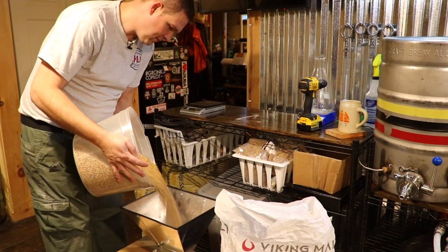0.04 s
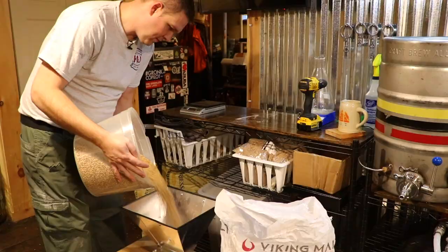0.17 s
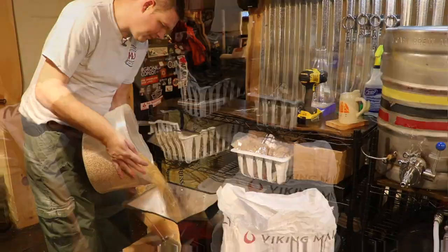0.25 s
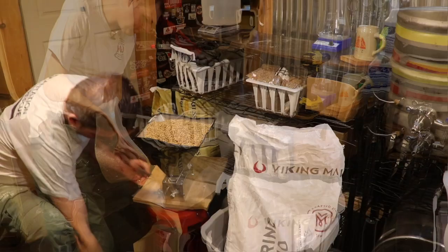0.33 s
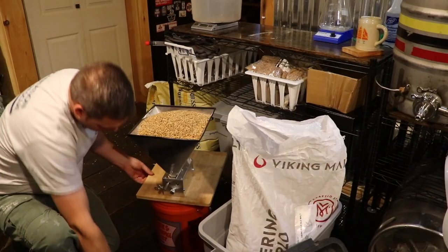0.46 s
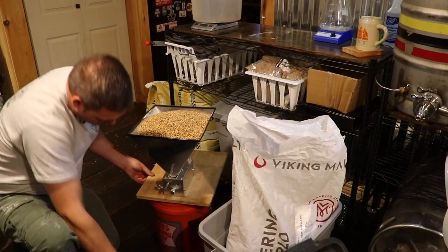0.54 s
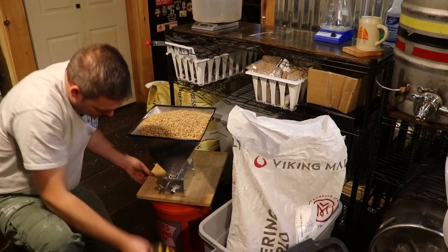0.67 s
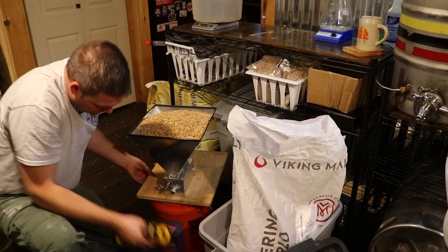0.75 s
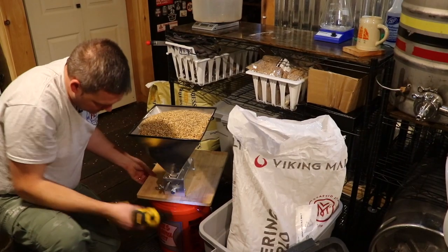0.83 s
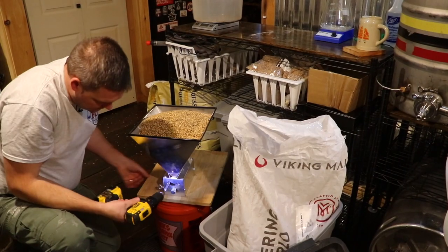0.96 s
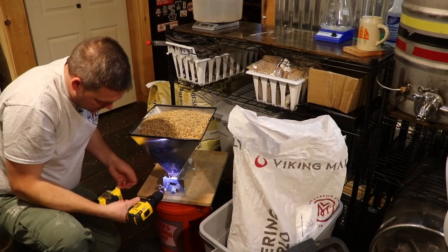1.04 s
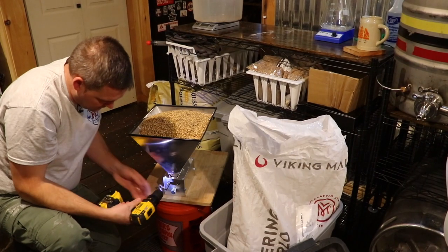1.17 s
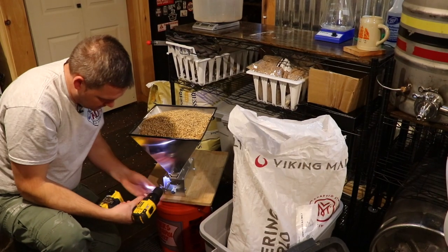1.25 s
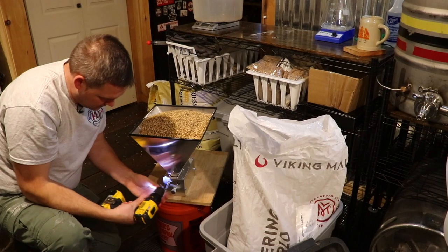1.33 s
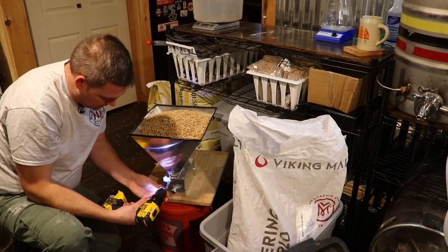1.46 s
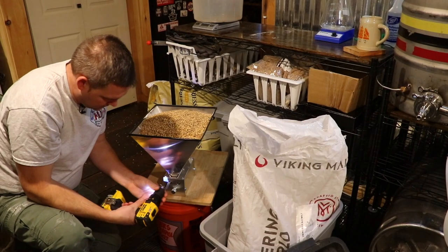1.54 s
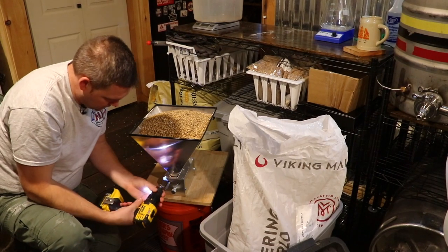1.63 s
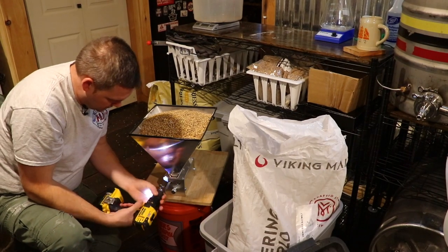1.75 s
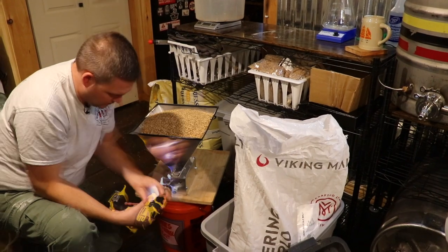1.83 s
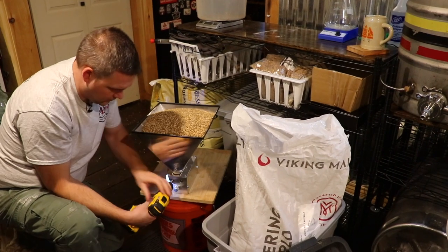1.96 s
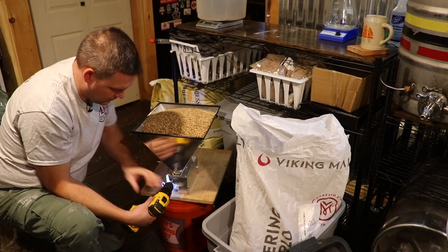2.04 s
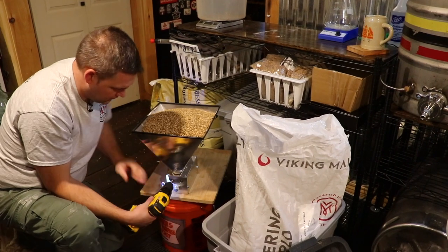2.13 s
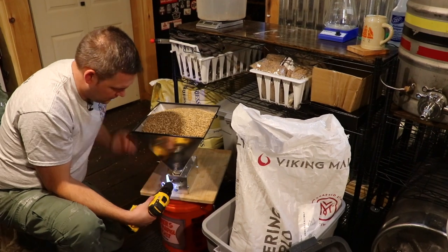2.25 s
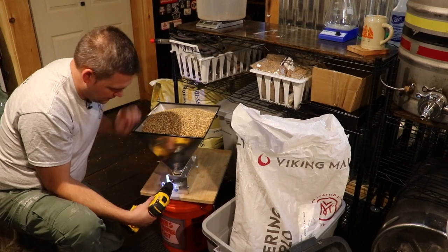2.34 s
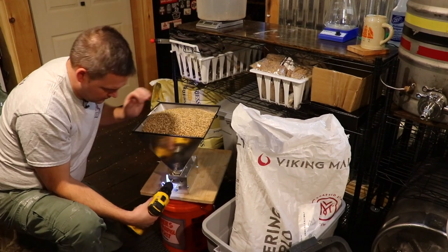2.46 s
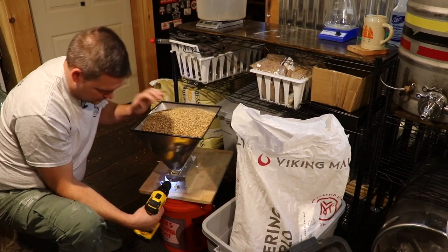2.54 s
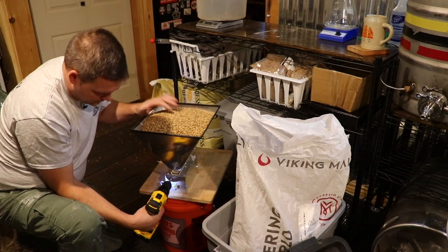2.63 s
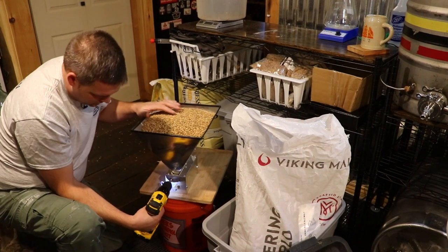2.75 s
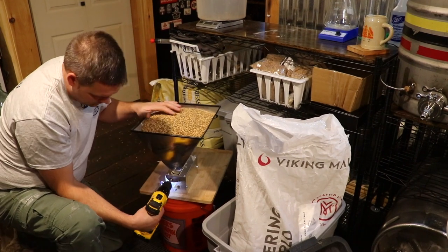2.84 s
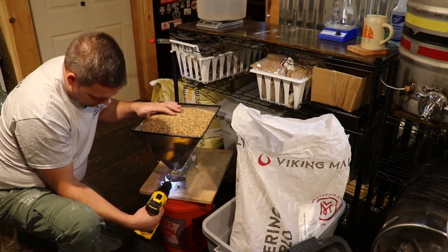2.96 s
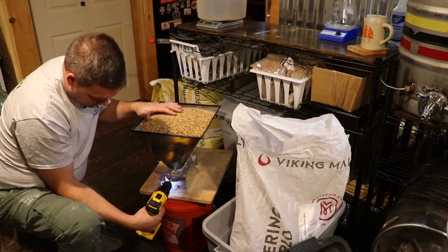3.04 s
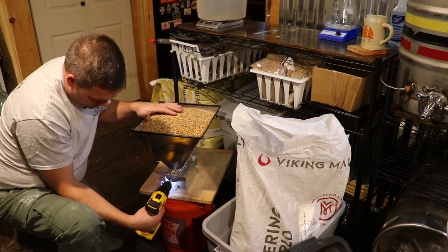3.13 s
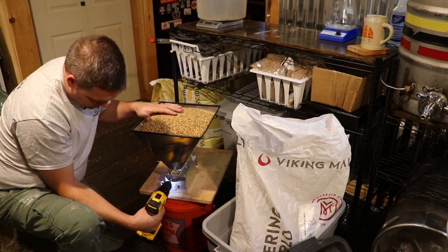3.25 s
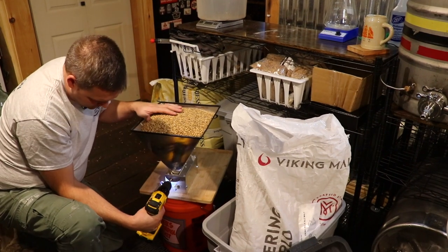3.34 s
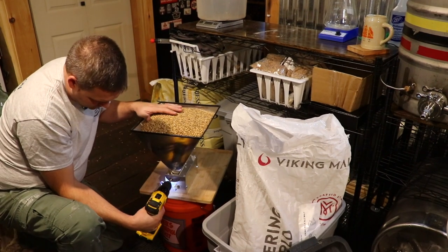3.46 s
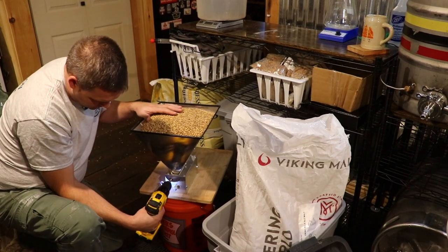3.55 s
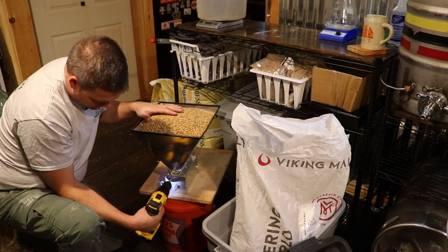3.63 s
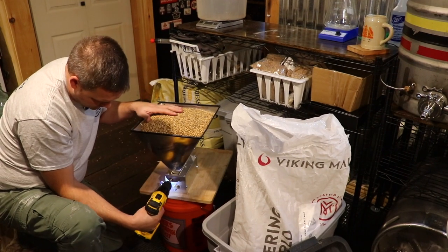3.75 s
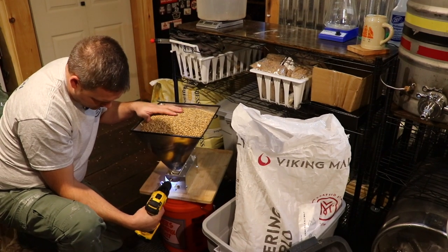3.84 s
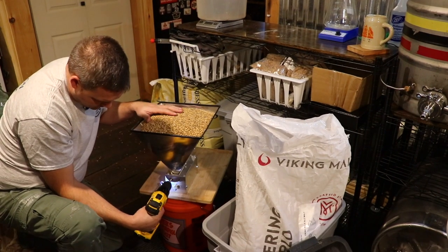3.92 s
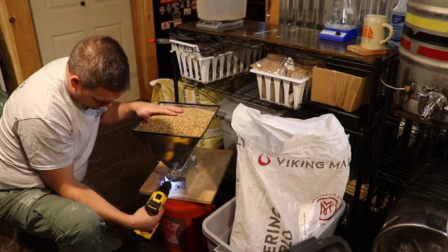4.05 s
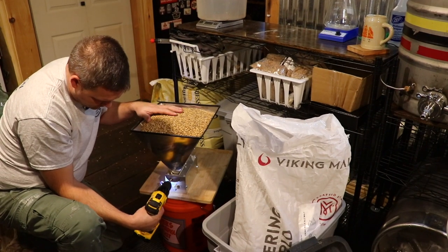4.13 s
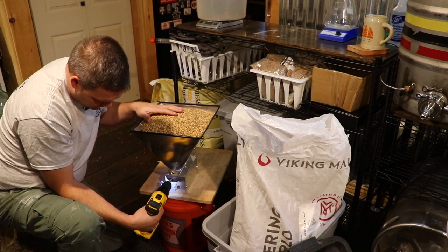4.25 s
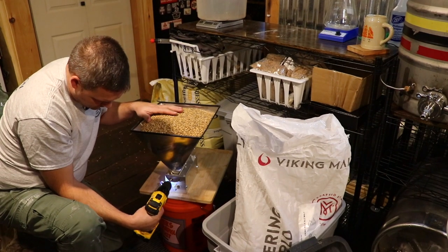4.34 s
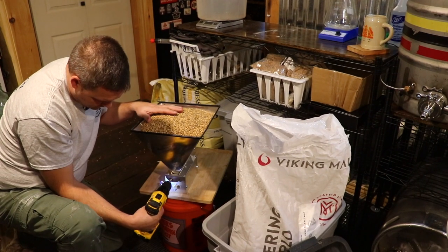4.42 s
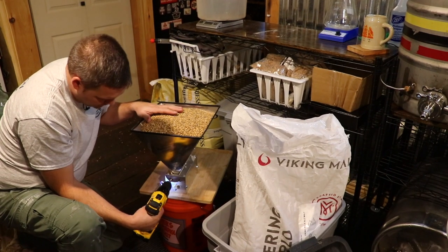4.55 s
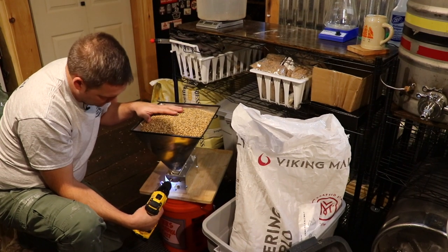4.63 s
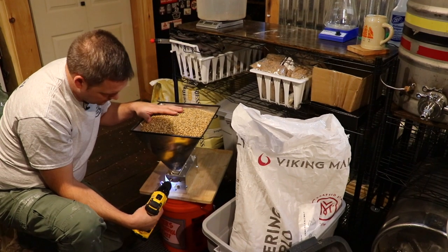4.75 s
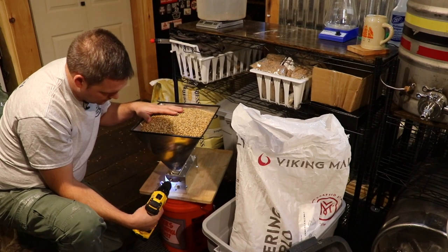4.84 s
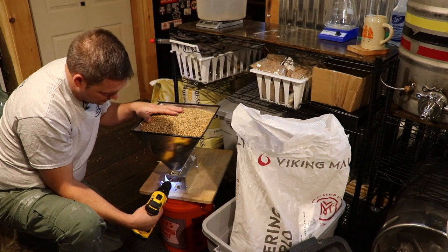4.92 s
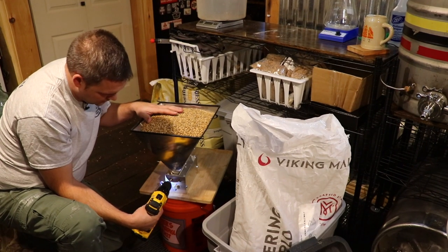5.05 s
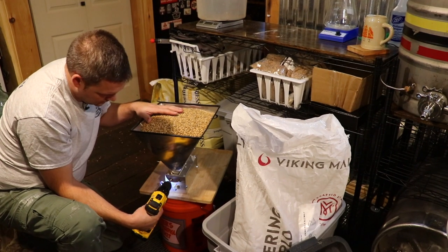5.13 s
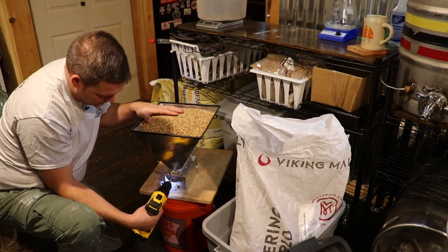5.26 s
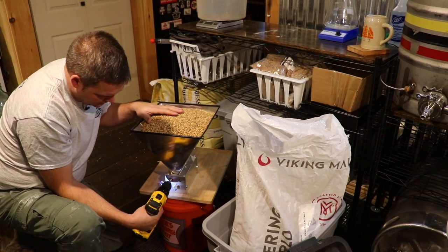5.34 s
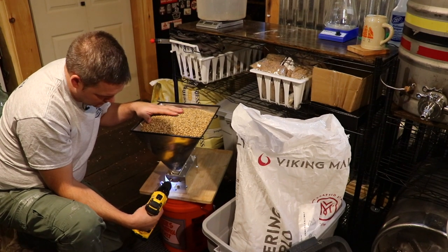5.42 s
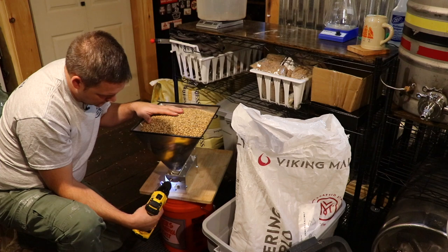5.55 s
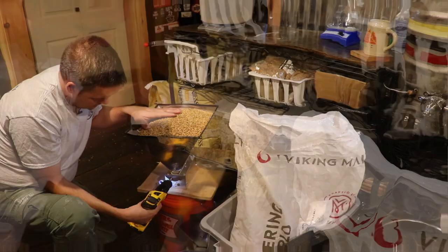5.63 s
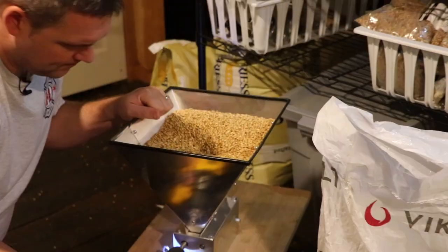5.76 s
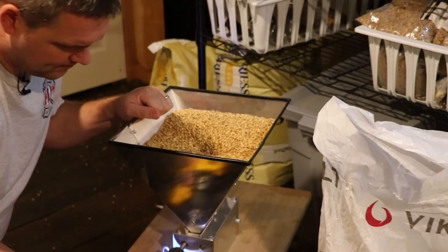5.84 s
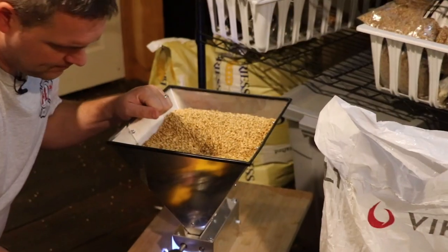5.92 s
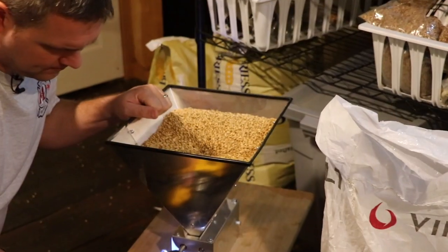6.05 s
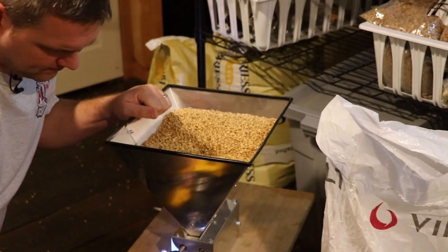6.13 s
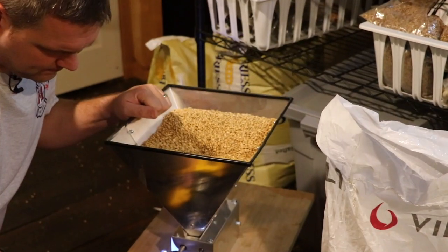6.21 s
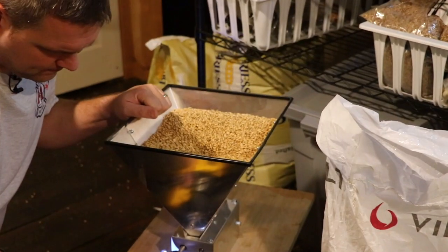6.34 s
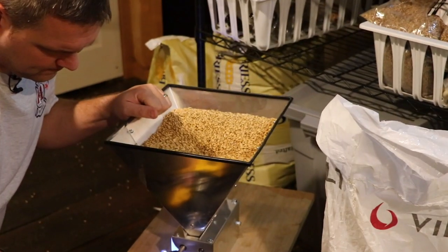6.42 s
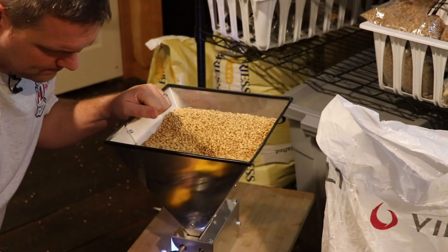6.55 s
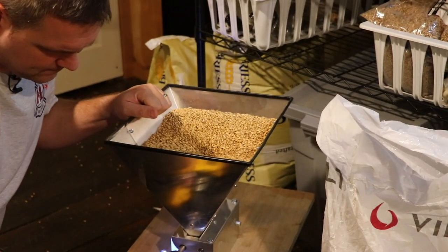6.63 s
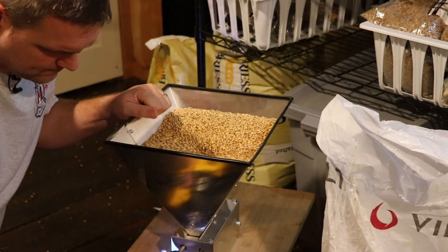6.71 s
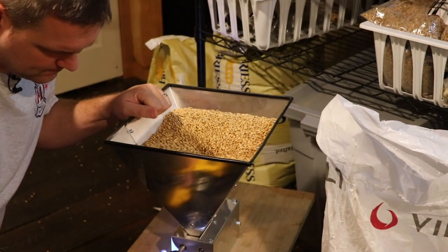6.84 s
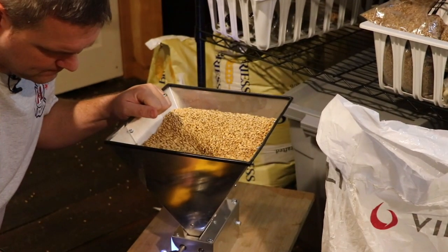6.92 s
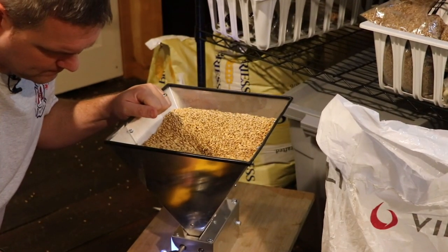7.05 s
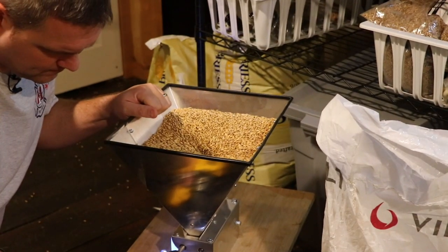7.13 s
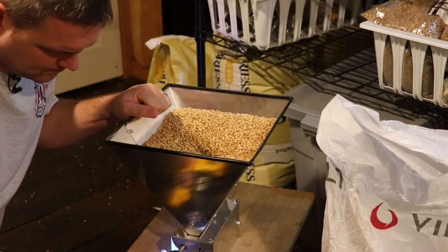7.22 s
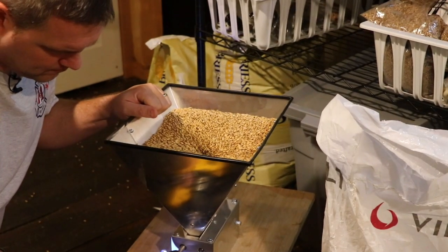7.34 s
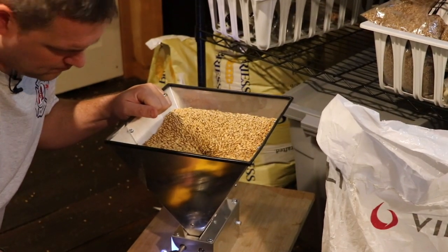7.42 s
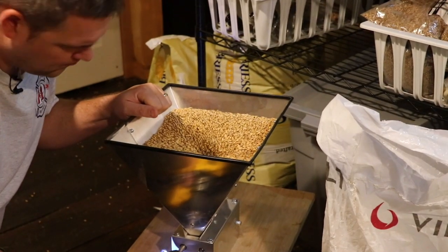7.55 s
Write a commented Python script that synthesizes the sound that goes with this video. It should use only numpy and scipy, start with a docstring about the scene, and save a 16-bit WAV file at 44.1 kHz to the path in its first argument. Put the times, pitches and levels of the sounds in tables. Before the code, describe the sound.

In a quiet garage, pouring kernels cease, metal jaws click, then a cordless drill whistles and whines faster and faster while rollers noisily crush grain.

```python
"""A quiet garage: malt pours into a steel hopper and stops; a cordless drill is clicked onto a roller mill's shaft.
The drill nudges the rollers once, then speeds up in steps: its speed control whistles as chopped-current tones,
its gears whine as orders of the shaft speed, and bursts of clicks, the cracking kernels, ring the mill, its board
and the bucket below. The last stretch is at full speed, from nearer."""
import sys
import numpy as np
from scipy import signal
from scipy.fft import rfft, irfft
from scipy.io import wavfile
from scipy.ndimage import uniform_filter1d

SR = 44100
rng = np.random.default_rng(int(sys.argv[2]) if len(sys.argv) > 2 else 0)


def generate_wav(signal):
    """Clip the signal to [-1, 1] and save it as 16-bit WAV at the path in sys.argv[1]."""
    frames = np.transpose(np.atleast_2d(signal))
    scaled = np.clip(frames, -1, 1) * 32767
    pcm = np.round(scaled).astype(np.int16)
    wavfile.write(sys.argv[1], SR, pcm)


N = 334278
TIME, FREQ = np.arange(N) / SR, np.fft.rfftfreq(N, 1 / SR)
FULL_SPEED_TURNS_PER_S = 353  # trigger fully in


def amp(db):
    """Decibels to gain."""
    return 10 ** (np.asarray(db) / 20)


def unit(x):
    """Scales to rms 1."""
    return x / np.sqrt(np.mean(x ** 2) + 1e-20)


def add(mix, start_s, sound):
    """Lays a sound into the mix at start_s, in place."""
    part = mix[max(round(start_s * SR), 0):][:len(sound)]
    part += sound[:len(part)]


def envelope(start_s, end_s, rise_s, fall_db_per_s):
    """Rises from start_s, holds until end_s, then dies away."""
    rise = np.clip((TIME - start_s) / rise_s, 0, 1)
    return rise * amp(-fall_db_per_s * np.maximum(TIME - end_s, 0))


def lift(modes, hz):
    """Gain in dB of a set of resonances (Hz, width Hz, dB)."""
    return sum(db / (1 + (2 * (hz - mode_hz) / width_hz) ** 2) for mode_hz, width_hz, db in modes)


def colour(x, points, modes=()):
    """Minimum-phase filter from a smooth spectrum and resonances, so that each click rings afterwards; rms 1."""
    hz = abs(np.fft.fftfreq(8192, 1 / SR))
    point_hz, point_db = np.transpose(points)
    smooth_db = np.interp(np.log(hz + 1), np.log(point_hz), point_db)
    log_gain = np.log(amp(smooth_db + lift(modes, hz)))
    ring = np.fft.ifft(np.exp(np.conj(signal.hilbert(log_gain)))).real
    return unit(signal.oaconvolve(x, ring[:len(ring) // 2])[:N])


def band(x, low_hz, high_hz):
    """One band of a sound, at rms 1."""
    below_high = 1 / (1 + (FREQ / high_hz) ** 10)
    below_low = 1 / (1 + (FREQ / low_hz) ** 10)
    return unit(irfft(rfft(x) * (below_high - below_low), N))


def waver(hz):
    """Random drift of rms 1, mostly slower than hz."""
    return unit(irfft(rfft(rng.standard_normal(N)) / (1 + (FREQ / hz) ** 2) ** 2, N))


def grains(per_s, spread_db):
    """A random train of clicks, mostly small, a few large; rms 1."""
    size = amp(spread_db * np.minimum(rng.exponential(1, N), 4))
    sign = rng.choice([-1, 1], N)
    return unit(size * sign * (rng.random(N) < per_s / SR))


def garage_air():
    """Steady coloured noise of the quiet garage."""
    # (frequency [Hz], relative level [dB])
    air_colour = [(12, -44), (20, -25), (87, 0), (119, -4.5), (153, 0), (191, -5), (362, -7.5), (478, -7.5),
                  (565, -3.5), (614, -10.5), (857, -6.5), (1500, -11), (1770, -13.5), (2400, -14.5),
                  (15500, -31.5)]
    return amp(-58) * colour(rng.standard_normal(N), air_colour)


def pouring():
    """Kernels patter on the heap, thinning until the bucket is tipped back; some strike bare steel and tick."""
    # patter spectrum: (frequency [Hz], relative level [dB])
    pour_colour = [(24, -43), (40, -13), (162, -6.5), (350, -11), (417, -3.5), (686, -9.5), (817, -5.5),
                   (998, -12), (1560, -11), (1770, -18.5), (3560, -11), (4800, -21), (7710, -24),
                   (9410, -20), (15500, -30)]
    # single kernels on steel: (time [s], peak level [dB])
    kernel_ticks = [(0.032, -21), (0.044, -19), (0.137, -17.5), (0.1748, -17.5), (0.259, -22), (0.281, -25),
                    (0.3, -23)]
    start_db, thins_db_per_s = -32, 20
    patter = colour(grains(per_s=5000, spread_db=1.5), pour_colour)
    stream = envelope(start_s=0, end_s=0.31, rise_s=0.001, fall_db_per_s=300)
    out = patter * amp(start_db - thins_db_per_s * TIME) * stream
    t = np.arange(600) / SR
    for tick_s, peak_db in kernel_ticks:
        tick = np.exp(-t / 0.0012) * rng.standard_normal(len(t))
        add(out, tick_s, amp(peak_db) * tick / abs(tick).max())
    return out


def chuck_clicks():
    """Steel jaws meet the shaft, then jerk against it: a noisy clack plus decaying modes, favoured by the spot."""
    # (time [s], peak level [dB], pitch factor, ring re clack [dB], clack decay [s], favoured frequency [Hz])
    chuck_hits = [(1.329, -34, 1.02, -2, 0.0028, 4600), (1.407, -35.5, 1.02, -9, 0.0022, 1330),
                  (1.411, -33, .995, 5, .002, 3960), (1.432, -47, 0.92, -12, .003, 2900),
                  (1.436, -44, 1.01, -8, .003, 3960), (1.701, -47, 1.02, -8, .003, 1330),
                  (2.862, -30.5, 1.3, -17, 0.0081, 3960), (2.881, -29, 0.88, -18, 0.013, 3960),
                  (2.932, -27, 1.0, -18, 0.0093, 2900)]
    # (frequency before the pitch factor [Hz], relative level [dB], t60 [s])
    chuck_modes = [(1330, -1, .022), (2900, -11, .015), (3960, 3, .018), (4600, -3, .011), (5280, 0, .011),
                   (7480, 4, .018)]
    # (frequency [Hz], relative level [dB])
    clack_colour = [(100, -4), (400, 5), (1400, 4), (3300, 6), (4600, -1), (6000, -13), (8000, -19),
                    (15500, -20)]
    favour_width_hz, favour_db, onset_s = 500, 8, 0.00044
    out, t = np.zeros(N), np.arange(SR // 10) / SR
    clatter = colour(rng.standard_normal(N), clack_colour)
    for hit_s, peak_db, pitch, ring_db, decay_s, favoured_hz in chuck_hits:
        spot = [(favoured_hz, favour_width_hz, favour_db)]
        ring = np.zeros(len(t))
        for hz, mode_db, t60_s in chuck_modes:
            decaying = amp(mode_db + lift(spot, hz) - 60 * t / t60_s)
            ring += decaying * np.sin(2 * np.pi * (hz * pitch * t + rng.random()))
        clack = clatter[rng.integers(N - len(t)):][:len(t)] * np.exp(-t / decay_s)
        click = (amp(ring_db) * ring + clack) * (1 - np.exp(-t / onset_s))
        add(out, hit_s, amp(peak_db) * click / abs(click).max())
    return out


def rub(start_s, end_s, db, points):
    """Friction: a dense train of coloured clicks that swells and dies away."""
    friction = colour(grains(per_s=6500, spread_db=5.5), points)
    return friction * amp(db) * envelope(start_s, end_s, rise_s=0.039, fall_db_per_s=130)


def hand_rub():
    """A hand slides over the drill's casing, which colours the friction."""
    # (frequency [Hz], relative level [dB])
    hand_colour = [(150, -12), (265, 14), (400, -15), (900, -17), (1380, 7), (1700, -4), (2200, 4),
                   (3500, -5), (5000, -21), (10000, -35)]
    return rub(1.83, 1.9, -57, hand_colour)


def sleeve_rustle():
    """A sleeve moves: duller friction of cloth."""
    # (frequency [Hz], relative level [dB])
    sleeve_colour = [(40, -12), (110, -14), (300, 3), (600, 1), (1200, -1), (2000, -29), (8000, -37)]
    return rub(1.92, 2.28, -60, sleeve_colour)


def speed_control(speed):
    """The chopped current whistles, most at half duty; the rotor adds side tones, and narrow pulses add overtones."""
    # trigger part way in: (on [s], off [s])
    squeezes = [(2.385, 2.63), (2.945, 5.62)]
    chop_hz, whistle_db = 3910, -37
    duty_at_rest, duty_per_turn_per_s = 0.091, 0.0032  # share of each cycle that the current is on
    chop = 2 * np.pi * chop_hz * TIME
    rotor = 2 * 2 * np.pi * np.cumsum(speed) / SR  # two cycles per turn
    narrow = 1 / (1 + (speed / 85) ** 4)  # 1 at rest, falls with speed
    lower_side = amp(-6.5 - 2.4 * narrow) * np.sin(chop - rotor)
    upper_side = amp(-31) * np.sin(chop + rotor)
    second = amp(-21.5) * np.sin(2 * chop - rotor / 2) + amp(-32) * np.sin(2 * chop - rotor)
    third = amp(-33) * np.sin(3 * chop)
    tone = np.sin(chop) + lower_side + upper_side + narrow * second + third
    duty = np.clip(duty_at_rest + duty_per_turn_per_s * speed, 0, 1)
    squeeze = sum(envelope(on_s, off_s, rise_s=0.035, fall_db_per_s=150) for on_s, off_s in squeezes)
    return np.sqrt(2) * amp(whistle_db) * tone * np.sin(np.pi * duty) * squeeze * amp(0.5 * waver(hz=50))


def motor_speed():
    """After each move of the trigger the motor closes in exponentially on its new speed, in turns per s."""
    # trigger moves: (time [s], target speed [turns/s], lag [s])
    trigger_moves = [(2.432, 80, .195), (2.625, 0, .06), (2.98, 51, .06), (3.48, 80, .15),
                     (3.598, 141, .052), (3.95, 144, .05), (4.15, 141, .03), (4.3, 146.5, .06),
                     (4.526, 243, .058), (5.21, 255.5, .035)]
    ease_s = 0.065  # the finger takes this long over each move
    speed = np.zeros(N)
    for move_s, target, lag_s in trigger_moves:
        at = round(move_s * SR)
        speed[at:] = target + (speed[at] - target) * np.exp(-TIME[:N - at] / lag_s)
    return np.maximum(uniform_filter1d(speed, round(ease_s * SR)), 1e-3)


def speed_gain(speed, cruise_db, db_per_doubling):
    """Level changes by a set number of dB with each doubling of speed; dies away below the stall speed."""
    cruise, stall = 148, 34.3  # turns per s
    return amp(cruise_db + db_per_doubling * np.log2(speed / cruise)) / (1 + (stall / speed) ** 2)


def motor_orders(speed, orders, housing, sag, flutter, rough_db):
    """Shaft and gear orders on one speed, shaken at random by the uneven load."""
    shaken_speed = speed * (1 + sag * waver(hz=12.35) + flutter * waver(hz=25.5))
    turns = np.cumsum(shaken_speed) / SR
    shake, out = waver(hz=54.6), np.zeros(N)
    for multiple, order_db in orders:
        tooth_db = rough_db * np.roll(shake, rng.integers(N))
        housing_db = np.interp(multiple * speed, *np.transpose(housing)) if housing else 0
        out += amp(order_db + housing_db + tooth_db) * np.sin(2 * np.pi * (multiple * turns + rng.random()))
    return np.sqrt(2) * out


def gear_rasp(speed):
    """Teeth scrape in the gearbox: noise that pulses once a turn, harder with speed."""
    # (frequency [Hz], relative level [dB])
    rasp_colour = [(800, 1), (2000, 18), (2350, 22.5), (2900, -28), (3700, -13), (4550, 21), (5300, 2),
                   (6200, -28), (6900, 14.5), (8200, -3), (12000, -7), (15500, -63)]
    once_a_turn = np.sin(2 * np.pi * np.cumsum(speed) / SR)
    scrape = rng.standard_normal(N) * (1 + 0.5 * once_a_turn)
    return colour(scrape, rasp_colour) * amp(-35) * np.sqrt(speed / speed.max())


def gear_whine(speed):
    """Motor orders radiate through the gearbox housing, louder while accelerating; the gear rasp joins them."""
    # (multiple of shaft speed, relative level [dB])
    easing_orders = [(1, -34.5), (2, -42), (10, -38), (15, -54), (16, -46), (19, -47), (30, -55), (31, -48),
                     (32, -44), (40, -53), (46, -56), (47, -54), (48, -52), (64, -55), (85, -53)]
    # gearbox radiation: (frequency [Hz], gain [dB])
    housing_gain = [(45, -44), (145, -7), (200, -8), (240, 6.5), (500, -19), (1000, -4), (1480, 4.5),
                    (1800, -1), (2140, 7.5), (2310, 8), (2430, 9.5), (2600, 0), (3300, 4), (3900, 6),
                    (4250, 6), (4700, -8.5), (5200, -10), (6200, 0), (7000, 3.5), (7700, -8), (8200, -6),
                    (9000, -12), (10000, -3), (12000, -11), (16000, -35)]
    eased = motor_orders(speed, easing_orders, housing_gain, sag=0.002, flutter=0.0035, rough_db=2.5)
    spin_up = np.clip(np.gradient(speed) * SR / 1000, 0, 0.25)  # 1000 turns per s per s
    spin_up_db = 12 * spin_up
    return (eased * amp(spin_up_db) + gear_rasp(speed)) * speed_gain(speed, cruise_db=-1, db_per_doubling=1.5)


def nearness():
    """0 while the mill is heard from afar, 1 once it is near."""
    middle_s, fade_s = 5.72, 0.14
    return np.clip((TIME - middle_s) / fade_s + 0.5, 0, 1)


def crushing(eased_speed):
    """Kernels burst in clumps between the rollers: the mill booms, husks snap and fizz, levels set by speed."""
    # spectrum: (frequency [Hz], level at a crawl [dB], level running [dB]), relative levels
    mill_colour = [(25.1, -45, -19), (73, -4, 5.5), (122, -3, 2.5), (173, -2.5, -1), (313, -10.5, -3),
                   (510, -8.5, -8), (1180, -5.5, 0.5), (1570, -10.5, -9), (2270, -19, -15.5),
                   (4000, -17.5, -14.5), (5080, -19, -22.5), (6260, -20, -18.5), (8160, -23.5, -26.5),
                   (15500, -48, -50.5)]
    # board, bucket and hopper: (frequency [Hz], width [Hz], lift at a crawl [dB], lift running [dB])
    mill_modes = [(185, 93, 4, 6), (287.6, 44, 13, 15.5), (440, 65, 4.5, 6), (606, 71, 5.5, 12),
                  (660, 25, -3, 0), (776, 13.4, 15.5, 10.5), (885, 22, 5.5, 6), (1099, 110, 1.5, 4),
                  (1247, 82, 12, 9), (2507, 28, 10, 7), (3080, 14, -4, 10.5), (3550, 22, 8, 5.5),
                  (3785, 38, -3, 2.5)]
    # grain crunches between halted rollers: (start [s], end [s], body [dB], crack [dB], fizz [dB])
    grain_shifts = [(2.66, 2.853, -48, -59, -63), (2.859, 3.008, -44.5, -47.5, -57)]
    near = nearness()
    speed = (1 - near) * eased_speed + near * FULL_SPEED_TURNS_PER_S
    running = np.clip((TIME - 3.4) / 1.4, 0, 1)  # the colour fades from crawl to running between 3.4 and 4.8 s
    crawl_points = [(hz, crawl_db) for hz, crawl_db, _ in mill_colour]
    run_points = [(hz, run_db) for hz, _, run_db in mill_colour]
    crawl_modes = [(hz, width_hz, crawl_db) for hz, width_hz, crawl_db, _ in mill_modes]
    run_modes = [(hz, width_hz, run_db) for hz, width_hz, _, run_db in mill_modes]

    def mill(x):
        return colour(x, crawl_points, crawl_modes), colour(x, run_points, run_modes)

    def part(pair, low_hz, high_hz):
        crawl, run = (band(x, low_hz, high_hz) for x in pair)
        return (1 - running) * crawl + running * run

    def level(cruise_db, db_per_doubling, near_db, wander_db):
        drift_db = near_db * near + wander_db * waver(hz=20)
        return speed_gain(speed, cruise_db, db_per_doubling) * amp(drift_db)

    bursts = grains(per_s=2200, spread_db=1.5) * amp(1.12 * waver(hz=43.6))
    crumbs = rng.standard_normal(N)
    boom, snap, dust = mill(bursts + 0.78 * crumbs), mill(bursts + crumbs), mill(bursts + 1.5 * crumbs)
    rumble = part(boom, 20, 259)
    body = part(boom, 254, 1344)
    crack = part(snap, 1580, 4230)
    fizz = part(snap, 4010, 11000) + part(dust, 11100, 22000) * amp(-7.5)
    out = rumble * level(cruise_db=-35.5, db_per_doubling=-1.1, near_db=2, wander_db=3)
    out += body * level(cruise_db=-22, db_per_doubling=3.5, near_db=-1.44, wander_db=0.5)
    out += crack * level(cruise_db=-31.5, db_per_doubling=1, near_db=2.97, wander_db=1)
    out += fizz * level(cruise_db=-43.5, db_per_doubling=4.5, near_db=2.5, wander_db=0.2)
    for start_s, end_s, body_db, crack_db, fizz_db in grain_shifts:
        crunch = (body + amp(-6) * rumble) * amp(body_db) + crack * amp(crack_db) + fizz * amp(fizz_db)
        out += crunch * envelope(start_s, end_s, rise_s=0.0073, fall_db_per_s=202)
    return out


def racing_motor():
    """Shaft and gear orders at full speed, heard from near."""
    # (multiple of shaft speed, relative level [dB])
    racing_orders = [(1, -26.7), (2, -41), (5.71, -45), (7.06, -44), (10, -41), (11, -45), (16, -51),
                     (17, -53), (18, -54), (18.5, -53), (19, -36), (30, -50), (31, -56), (38, -54),
                     (40, -55.5)]
    speed = np.full(N, FULL_SPEED_TURNS_PER_S)
    return amp(-1) * motor_orders(speed, racing_orders, None, sag=0.0025, flutter=0.0007, rough_db=2.2)


def knocking():
    """A hard kernel jerks the board against the bucket: a dull, quickly damped sine."""
    # (time [s], level before the damping [dB], frequency [Hz])
    board_knocks = [(6.294, -25, 114), (6.785, -17.5, 120), (7.021, -15.5, 112)]
    out, t = np.zeros(N), np.arange(SR // 4) / SR
    shape = (1 - np.exp(-t / 0.0044)) * np.exp(-t / 0.022)
    for knock_s, knock_db, hz in board_knocks:
        add(out, knock_s, amp(knock_db) * shape * np.sin(2 * np.pi * hz * t))
    return out


def garage(x, t60_s, wet_db):
    """A short tail of scattered reflections from the cluttered room."""
    t = np.arange(SR // 2) / SR
    scattered = (rng.random(len(t)) < 0.1) * (t > 0.004)
    taps = rng.standard_normal(len(t)) * scattered * amp(-60 * t / t60_s)
    tail = signal.oaconvolve(x, taps / np.linalg.norm(taps))[:N]
    return (x + amp(wet_db) * tail) / np.hypot(1, amp(wet_db))


def scene():
    """All sources in the room; both channels are the same."""
    speed, near = motor_speed(), nearness()
    handling = chuck_clicks() + hand_rub() + sleeve_rustle()
    drill = (1 - near) * gear_whine(speed) + near ** 2 * racing_motor() + speed_control(speed)
    mill = garage(crushing(speed) + knocking(), t60_s=0.15, wet_db=-18)
    mid = garage(pouring() + handling, t60_s=0.26, wet_db=-10) + mill + drill + garage_air()
    return np.array([mid, mid])


def record(dry):
    """Low-pass that removes the extreme treble."""
    low_pass = signal.firwin(511, 15750, window=("kaiser", 9), fs=SR)  # edge in Hz
    return signal.oaconvolve(dry, low_pass[None], "same")


dry = scene()
out = record(dry)
generate_wav(out)
```